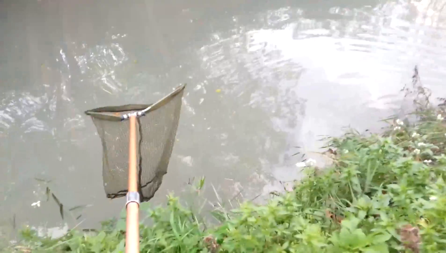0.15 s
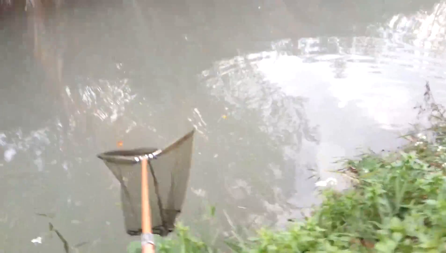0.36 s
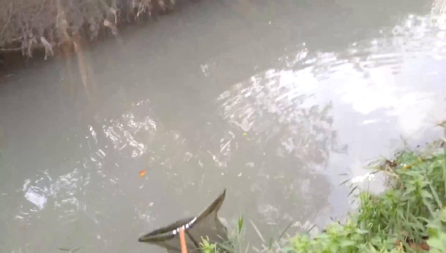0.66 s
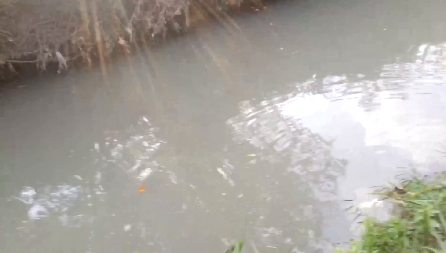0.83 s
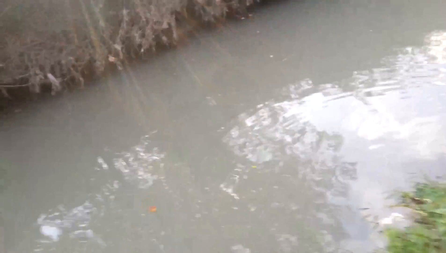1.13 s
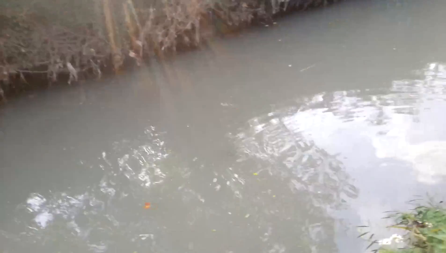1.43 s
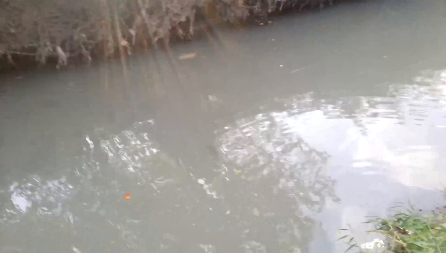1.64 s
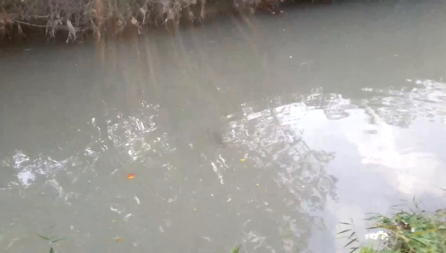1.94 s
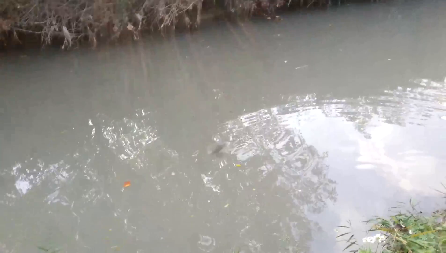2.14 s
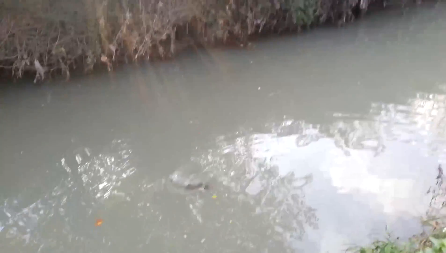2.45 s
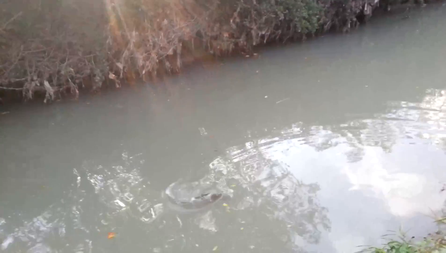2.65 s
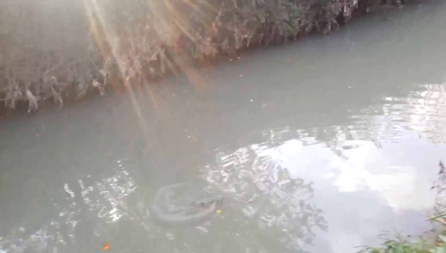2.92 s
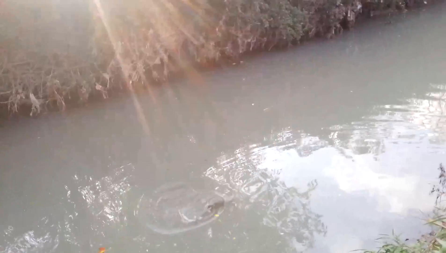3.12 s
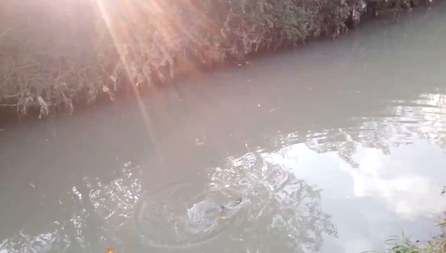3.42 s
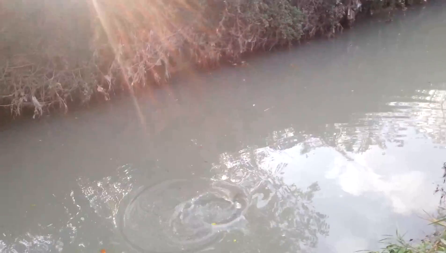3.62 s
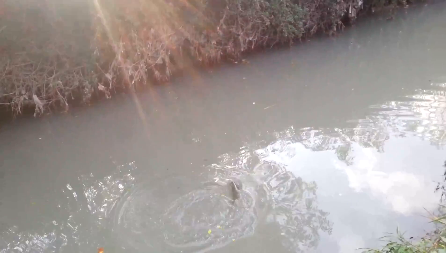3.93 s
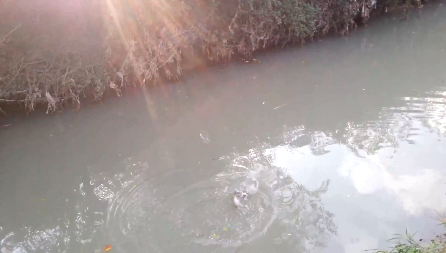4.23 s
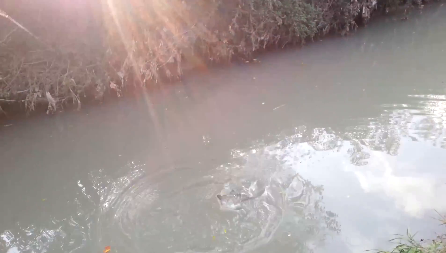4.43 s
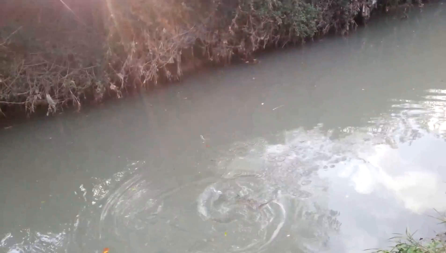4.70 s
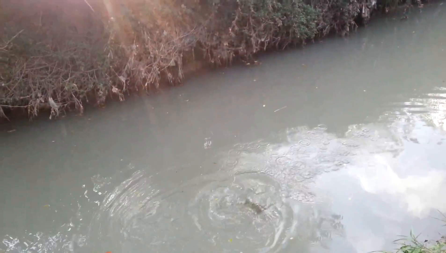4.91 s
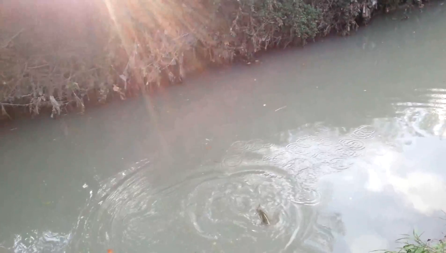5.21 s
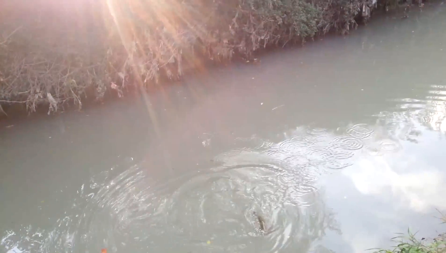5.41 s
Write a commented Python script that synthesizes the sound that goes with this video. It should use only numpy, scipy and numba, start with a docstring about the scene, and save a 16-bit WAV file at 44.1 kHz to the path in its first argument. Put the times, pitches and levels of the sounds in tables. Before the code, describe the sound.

Close handling sounds come first: bright, dry clicks, small rattles and scratchy net or cloth rubbing, leaning left. After about two seconds a fish a few metres off starts to thrash, lightly at first, then harder, with crisp wet slaps, rising bubble gulps and hissing droplets. Splashing stops before the end, leaving a faint airy hush and a couple of late bubbles. Open air, small paired microphones.

```python
"""On the bank of a canal, a hooked fish thrashes at the surface in front of a pair of small microphones.
Tackle clicks (short rings, knocks and rattles) and cloth rustles (scratchy noise) come first, close by.
Then come three bouts of tail slaps, gliding bubbles and spray, made of short sine grains and noise.
Behind it all lie a soft outdoor hush of noise bands and a faint far hum, one sine."""
import sys
import numpy as np
from scipy import signal
from scipy.io import wavfile
from scipy.ndimage import uniform_filter1d
from numba import njit

SR = 44100
rng = np.random.default_rng(int(sys.argv[2]) if len(sys.argv) > 2 else 0)


def bounce(signal):
    """Save signal as a 16-bit WAV file at the path given by the first command-line argument."""
    frames = np.transpose(np.atleast_2d(signal))
    limited = np.clip(frames, -1, 1)
    pcm = np.round(limited * 32767).astype(np.int16)
    wavfile.write(sys.argv[1], SR, pcm)


N = 245195

# tail slaps on the water: t/s, slap level/dB, centre f/Hz, level of the spray crack/dB
TAIL_SLAPS = [(2.428, -32, 2400, -43.5), (2.485, -28, 2430, -59), (3.1614, -19, 2800, -34.5),
              (3.255, -25, 1300, -68), (3.275, -34, 4180, -58), (3.414, -23, 1750, -44.5),
              (3.575, -27.5, 1320, -45), (3.645, -25.5, 2120, -55), (4.2104, -13.5, 2880, -55),
              (4.2211, -11.5, 1080, -39), (4.2882, -25, 1010, -47), (4.5256, -11.5, 2280, -37),
              (4.536, -13, 3120, -45), (4.587, -25, 1190, -46), (4.734, -29.5, 1060, -62)]


def water():
    """The fish at the surface: bubbles, slaps and churn share one body of sound, with spray on top."""
    churn_db = surge_level()
    body = band(big_bubbles() + tail_slaps() + churn(churn_db), 213, 19000)
    # the bank sends one early echo, which weakens the sound near 1.6, 2.7 and 3.7 kHz
    echo = np.roll(body, int(.00093 * SR))
    body = body + 0.17 * echo
    # the left microphone faces the water and lifts 2-3 kHz
    # the right one is shaded there and two samples early
    presence = mode(body, 2680.0, 2000.0)
    left = body + 0.58 * presence
    right = np.roll(body, -2) - 0.59 * presence
    return np.array([left, right]) + undb(-4.0) * scatter(body, 0.0042) + spray(churn_db)


def tail_slaps():
    """Each slap is only a few cycles, falling in pitch as the cavity in the water widens."""
    s, db, hz, _ = np.transpose(TAIL_SLAPS).astype(float)
    rise = np.full(len(s), .25)
    return ring(s, -undb(db), 1.25 * hz, 0.75 * hz, 3.4 / hz, rise, 1.)


def big_bubbles():
    """The loudest bubbles and closing pockets of air: each rings as a sine that glides in pitch."""
    # bubbles and air pockets: t/s, level before the flutter/dB, first f/Hz, last f/Hz, length/ms
    air_pockets = [(2.348, -32, 1690, 1780, 8.3), (2.35, -39, 940, 1000, 8), (2.363, -24.5, 1090, 1060, 9),
                   (2.362, -33, 1840, 1690, 14), (2.403, -32, 599, 950, 29), (2.434, -38, 391, 630, 32),
                   (2.468, -40.5, 680, 890, 28), (2.483, -32, 1710, 1790, 7.3),
                   (2.525, -37, 1560, 1940, 20), (2.559, -36.5, 2380, 2200, 11),
                   (2.566, -34.5, 600, 820, 18), (2.604, -34.5, 2020, 1980, 9.7),
                   (2.755, -31.5, 1314, 1605, 17), (2.805, -44.5, 1267, 1200, 20),
                   (2.927, -39.5, 2010, 1800, 21), (3.079, -50, 860, 1280, 30),
                   (3.122, -37.5, 1210, 1176, 26), (3.148, -36.5, 936, 1250, 42),
                   (3.19, -32, 2980, 2870, 5.7), (3.201, -31.5, 1192, 1360, 30),
                   (3.225, -42, 1400, 2290, 10), (3.257, -35, 427, 487, 20), (3.256, -31, 1235, 1210, 11),
                   (3.328, -38, 1200, 1150, 16), (3.326, -39, 540, 610, 20), (3.388, -26.5, 448, 1200, 19),
                   (3.407, -34, 1870, 2650, 7.3), (3.422, -33, 740, 800, 10), (3.467, -31, 1640, 1660, 9.5),
                   (3.505, -28.5, 2350, 2350, 12), (3.515, -16.5, 3200, 3200, 1.7),
                   (3.517, -32, 1800, 1850, 7.9), (3.53, -33.5, 1860, 2540, 14),
                   (3.565, -33.5, 542, 990, 33), (3.591, -30.5, 4640, 4800, 5.7),
                   (3.644, -33, 4430, 4550, 11), (3.608, -26.5, 2680, 2620, 8.8),
                   (3.613, -43, 644, 720, 12), (3.622, -22, 1730, 1640, 10), (3.7, -39, 585, 1254, 34),
                   (3.757, -39.5, 1630, 2370, 31), (3.72, -34.5, 2330, 2500, 21),
                   (3.791, -43, 1873, 2140, 31), (4.054, -46, 873, 2400, 53), (4.17, -32, 1730, 2430, 13),
                   (4.181, -33, 410, 520, 15), (4.183, -25, 2810, 3150, 7.4), (4.22, -19.5, 1716, 1690, 14),
                   (4.226, -9.5, 1220, 1200, 2.2), (4.238, -36, 790, 680, 30), (4.2205, -22, 520, 600, 8),
                   (4.261, -34, 2130, 2070, 15), (4.28, -25.5, 1840, 1720, 8.8),
                   (4.301, -36.5, 1190, 1250, 23), (4.33, -35, 3340, 3380, 9), (4.338, -47, 216, 420, 25),
                   (4.392, -30, 2200, 2250, 5), (4.407, -38, 253, 990, 30), (4.448, -27, 2700, 2950, 6),
                   (4.452, -37.5, 602, 1390, 36), (4.476, -33, 2840, 2930, 6.4),
                   (4.492, -25, 2300, 2140, 5.6), (4.509, -38, 903, 1350, 26),
                   (4.526, -14, 2310, 2430, 6.1), (4.532, -24, 1810, 1960, 12), (4.543, -27, 1120, 1160, 9),
                   (4.567, -30.5, 1000, 1150, 11), (4.589, -36, 998, 1050, 25),
                   (4.587, -24, 3980, 4000, 4.9), (4.606, -21, 1160, 3330, 10),
                   (4.759, -33.5, 3170, 3240, 8), (4.808, -41.5, 1106, 980, 24), (5.277, -40, 980, 990, 18),
                   (5.291, -50, 1010, 1510, 24), (5.324, -37.5, 2170, 2360, 5.6),
                   (5.329, -39, 2350, 3900, 13)]
    s, db, first, last, ms = np.transpose(air_pockets).astype(float)
    # a pocket that glides far upward is still opening to the air, so it swells for longer
    rise = np.clip(0.062 + 0.29 * np.log2(last / first), .08, .5)
    big = ring(s, undb(db), first, last, ms / 1000, rise, 1.79)
    flutter_db = 1.3 * walk(260) + 1.2 * walk(70)  # from the heaving surface
    return big * undb(flutter_db)


def surge_level():
    """Churn level in dB over the fish's surges: quick rises, short holds, slower falls."""
    # surges of the thrashing fish: t at full strength/s, time held/s, churn level before its flicker/dB
    fish_surges = [(2.372, 0.094, -42), (2.573, 0.0058, -46.5), (2.7, 0.13, -54.5), (3.14, 0.25, -43.5),
                   (3.41, 0.0066, -39.5), (3.595, 0.047, -37.5), (3.7, 0.031, -49), (4.202, 0.056, -37),
                   (4.33, 0.096, -36), (4.52, 0.059, -36.5), (4.7, 0.023, -46.5)]
    rise_db_s, fall_db_s = 220, 89
    return swells(*np.transpose(fish_surges), rise_db_s, fall_db_s)[0]


def churn(churn_db):
    """Many small random bubbles, plus a wash of bubbles too many to tell apart."""
    # loudness of small bubbles by pitch: f/Hz, relative level/dB
    bubble_colour = [(250, -22), (550, -8.5), (1200, -2), (1550, 0.5), (2300, 4.5), (3200, -0.5),
                     (4800, -3.5)]
    count = 7000
    u = rng.random((count, 5)).T  # chance values for time, pitch, length, loudness and glide
    s = u[0] * (N - 1) / SR
    hz = 250 * 19.3 ** u[1]
    cycles = 4.8 + 16 * u[2] ** 2.2
    hz_at, db_at = np.transpose(bubble_colour)
    tint_db = np.interp(np.log(hz), np.log(hz_at), db_at)
    size = undb(tint_db + 3.2 * np.minimum(-np.log(1 - u[3]), 2.8))
    last_hz = hz * (0.949 + 0.58 * u[4] ** 2)
    swarm = ring(s, size, hz, last_hz, cycles / hz, np.full(count, .12), 1.6)
    wash = unit(band(rng.standard_normal(N), 790, 3560))
    return unit(unit(swarm) + 0.43 * wash) * undb(churn_db + 2.27 * walk(40))


def spray(churn_db):
    """Hissing, ticking droplets, separate at each microphone, with a short crack at each slap."""
    s, _, _, crack_db = np.transpose(TAIL_SLAPS).astype(float)
    drops = np.array([unit(band(rng.standard_normal(N) + crackle(1100, 1.7), 2400, 10040))
                      for _ in range(2)])
    # spray grows more slowly than the churn below it
    spray_db = -52 + 0.62 * (churn_db + 42.0) + 1.9 * walk(24.8)
    return drops * (undb(spray_db) + bursts(s, crack_db, 0.0078))


def scatter(x, decay_s):
    """Bank, reeds and body throw back a short diffuse smear, different at each microphone."""
    t = np.arange(2000) / SR
    smears = []
    for _ in range(2):
        tail = unit(rng.standard_normal(2000) * np.exp(-t / decay_s)) / np.sqrt(2000)
        smears.append(signal.fftconvolve(x, tail)[:N])
    return np.array(smears)


def tackle():
    """Hard little clicks: a few cycles of ring, a knock, a low thud, a tick and a short rattle."""
    # clicks, levels before filters: t/s, ring level/dB, ring f/Hz, low knock level/dB, knock f/Hz,
    # treble tick level/dB, rattle level against the ring/dB, left minus right/dB
    tackle_clicks = [(0.036, -25.5, 2120, -38, 1100, -37.5, -8, 0.5),
                     (0.2861, -17.5, 2980, -25, 780, -34.5, -7, 3.5),
                     (0.3574, -1.5, 3040, -25, 1500, -55, -0.5, -4),
                     (0.386, -29, 2500, -46, 1200, -35, 3, -7), (0.426, -26, 2400, -46, 1200, -35, -2, -1),
                     (0.4426, -23.5, 2970, -42, 1200, -30.5, 2, -5),
                     (0.46, -31, 2920, -31.5, 880, -33, 14.5, -8),
                     (0.6267, 1, 3116, -5, 1500, -27, -9.5, 9.5),
                     (0.9777, -35, 3100, -48, 1200, -30, -5, 5), (1.061, -24, 2540, -41, 1190, -49, -2, 6),
                     (1.1085, -22, 2450, -30, 1200, -47, -5, 4),
                     (1.3255, -28.5, 2360, -49, 1200, -49, 4.5, 5),
                     (1.814, -23, 2370, -26, 1230, -29.5, 7, -0.5),
                     (1.82, -25, 2720, -34, 1210, -26.5, 0, -5), (1.848, -47, 2800, -30, 840, -31, -15, -6)]
    s, db, hz, knock_db, knock_hz, tick_db, after_db, pan_db = np.transpose(tackle_clicks).astype(float)
    lag_ms = .3  # the louder microphone is the nearer one and hears the click first
    each, out = np.ones(len(s)), []
    for side in (1, -1):  # left, right
        at = s + np.maximum(-side * lag_ms * np.sign(pan_db), 0) / 1000
        share = side * pan_db / 2
        # the left microphone rings on longer
        clink = ring(at, undb(db + share), hz, hz, (2.7 + 0.5 * side) / hz, 0.3 * each, 1.)
        upper = ring(at, undb(db + share - 9.5), 1.64 * hz, 1.15 * hz, 4.6 / hz, 0.04 * each, 1.)
        knock = ring(at, undb(knock_db), knock_hz, 0.69 * knock_hz, 2.96 / knock_hz, 0.13 * each, 1.)
        # a one-sided low thud from overload, strongest at the left when the click is on its side
        thud_db = knock_db + 4.4 * np.minimum(share, pan_db / 2) - 24.0
        thud = ring(at, undb(thud_db), 150 * each, 120 * each, 0.0011 * each, 0.31 * each, 0.79)
        rattle = rng.standard_normal(N) * bursts(at, db + after_db, 0.0034)
        rattle = mode(mode(rattle, 2800.0, 1200.0), 2800.0, 1200.0)
        tick = unit(band(rng.standard_normal(N), 3650, 11700)) * bursts(at, tick_db + share, 0.0011)
        out.append(band(clink + upper + knock, 520, 18000) + thud + rattle + tick)
    return np.array(out)


def rustle():
    """Cloth and net rub: dense scratchy ticks through the cloth's broad resonances, with a thin hiss."""
    # resonances of the cloth: f/Hz, width/Hz, relative level/dB
    cloth_modes = [(970, 530, -5.5), (2210, 1500, 1), (3340, 1200, -0.5), (4470, 730, -11)]
    # rubbing strokes, levels before the flicker: t at full strength/s, time held/s,
    # rub level/dB, hiss level/dB, left minus right/dB
    rub_strokes = [(.05, 0.12, -49, -57.5, 2), (.37, 0.13, -44.5, -52, 2.5), (.6, 0.26, -56, -61.5, 4.5),
                   (1.03, 0.1, -41.5, -46.5, 4.5), (1.2, 0.26, -46, -49.5, 6), (1.7, 0.26, -46, -51, 3.5),
                   (2.02, 0.11, -50, -56.5, 4), (2.3, 0.27, -49.5, -53, 4)]
    rise_db_s, fall_db_s = 78, 87
    s, held, rub_db, hiss_db, pan_db = np.transpose(rub_strokes)
    stroke_db, top = swells(s, held, rub_db, rise_db_s, fall_db_s)
    # glide from one stroke's settings to the next
    thin_db = uniform_filter1d((hiss_db - rub_db)[top], size=2000)
    pan = uniform_filter1d(pan_db[top], size=2000)
    out, shared, flicker_db = [], crackle(1500, 0.96), 1.4 * walk(90)
    for side in (1, -1):  # left, right
        ticks = shared + 1.65 * crackle(1200, 1.1) + 2.0 * rng.standard_normal(N)
        rub = sum(undb(db) * mode(ticks, hz, width) for hz, width, db in cloth_modes)
        rub = unit(band(rub, 590, 4160))
        hiss = unit(band(ticks + 5.0 * rng.standard_normal(N), 2750, 11100))
        share = side * pan / 2
        both = undb(share) * rub + undb(thin_db + 0.053 * share) * hiss
        out.append(undb(stroke_db + flicker_db) * both)
    return np.array(out)


def hush():
    """Half-octave noise bands, each with its own random level changes, plus a faint wandering hum."""
    # colour of the outdoor hush: f/Hz, relative level per Hz/dB
    hush_colour = [(40, -23.5), (120, -13), (250, -5.5), (450, -5), (800, -5.5), (1400, -11.5), (4000, -13),
                   (6000, -24), (15000, -21)]
    hush_db, hum_hz, hum_db = -51, 403, -69
    hz_at, db_at = np.transpose(hush_colour)
    out = 0
    for hz in 30 * 2 ** np.arange(0, 9.1, .5):
        mid, side = (band(rng.standard_normal(N), hz / 2 ** .25, hz * 2 ** .25) for _ in range(2))
        # left and right are partly alike around 350 Hz, and separate far from it
        alike = .5 * np.exp(-np.log(hz / 350) ** 2 / 0.64)
        pair = np.sqrt(1 + alike) * mid + np.sqrt(1 - alike) * side * np.array([[1], [-1]])
        db = np.interp(np.log(hz), np.log(hz_at), db_at) + 1.5 * walk(18)
        out = out + undb(db) * pair
    tone = np.sqrt(2) * np.sin(2 * np.pi * hum_hz * np.arange(N) / SR)  # rms 1
    hum = undb(hum_db + 2.0 * walk(2.6)) * tone  # its level wanders, its pitch is steady
    return undb(hush_db) * unit(out) + hum


def undb(db):
    """Decibels to gain."""
    return 10 ** (np.asarray(db) / 20)


def unit(x):
    """Scale to rms 1."""
    return x / np.sqrt(np.mean(x ** 2))


def band(x, lo_hz, hi_hz):
    """Keep mainly the pitches between two limits (band-pass)."""
    sos = signal.butter(2, [lo_hz, min(hi_hz, .49 * SR)], "band", fs=SR, output="sos")
    return signal.sosfilt(sos, x)


def mode(x, hz, width):
    """One resonance, gain 1 at its centre."""
    return signal.lfilter(*signal.iirpeak(hz, hz / width, SR), x)


@njit
def ring(s, size, first_hz, last_hz, length, rise, bend):
    """Sum of sine grains that swell for a share (rise) of their length in s, glide and die away."""
    out = np.zeros(N)
    for k in range(len(s)):
        n, phase = length[k] * SR, 0.
        start = int(s[k] * SR)
        for i in range(min(int(2.5 * n), N - start)):
            u = i / n
            glide = min(u, 1.15) ** bend  # a bend above 1 makes the glide speed up
            phase += 2 * np.pi * first_hz[k] * (last_hz[k] / first_hz[k]) ** glide / SR
            swell = np.sin(np.pi / 2 * min(u / rise[k], 1.)) ** 2
            fall = max(u - rise[k], 0.) / (1 - rise[k])
            fade = np.exp(-(1.2 - 2 * rise[k]) * fall - fall ** 2)
            out[start + i] += size[k] * swell * fade * np.sin(phase)
    return out


def bursts(s, db, decay_s):
    """Envelope of sudden bursts that decay exponentially."""
    hits = np.zeros(N)
    np.add.at(hits, (np.asarray(s) * SR).astype(int), undb(db))
    return signal.lfilter([1], [1, -np.exp(-1 / (decay_s * SR))], hits)


def swells(s, held_s, db, rise_db_s, fall_db_s):
    """Level in dB of events that rise, hold and fall away, and which one is on top at each moment."""
    t = np.arange(N) / SR - s[:, None]
    rising = rise_db_s * np.minimum(t, 0)
    falling = fall_db_s * np.maximum(t - held_s[:, None], 0)
    each = db[:, None] + rising - falling
    return each.max(axis=0), each.argmax(axis=0)


def walk(rate):
    """Smooth random wander, rms 1, from random levels that change `rate` times a second."""
    k = int(SR / rate)
    steps = np.repeat(rng.standard_normal(N // k + 1), k)
    return unit(uniform_filter1d(uniform_filter1d(steps, k), k)[:N])


def crackle(per_s, spread_db):
    """Random ticks of uneven size, rms 1."""
    hits = rng.random(N) < per_s / SR
    size = undb(spread_db * np.minimum(rng.exponential(size=N), 4))
    return unit(hits * size * rng.standard_normal(N))


def scene():
    """Everything at the two microphones."""
    return water() + tackle() + rustle() + hush()


def record(dry):
    """Peaks beyond full scale clip, as the loudest click does; the treble above 14.5 kHz is cut."""
    top_cut = signal.ellip(8, .2, 60, 14500, fs=SR, output="sos")
    return signal.sosfilt(top_cut, np.clip(dry, -1, 1))


dry = scene()
out = record(dry)
bounce(out)
```